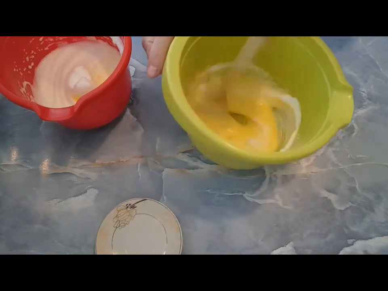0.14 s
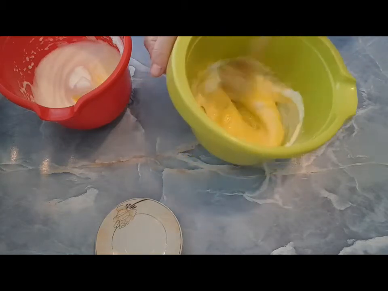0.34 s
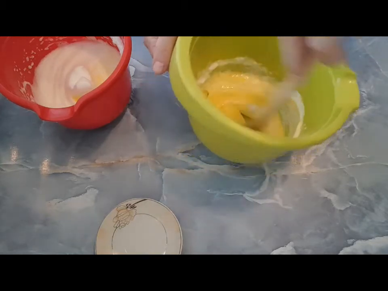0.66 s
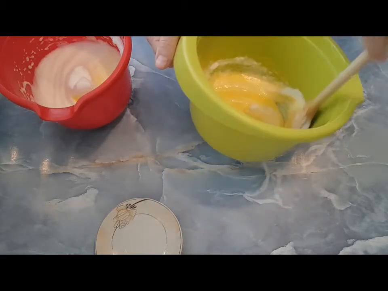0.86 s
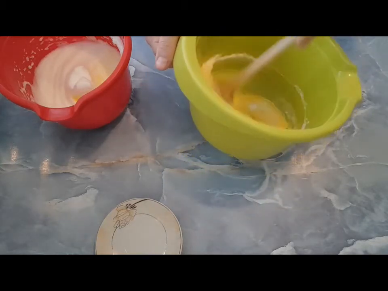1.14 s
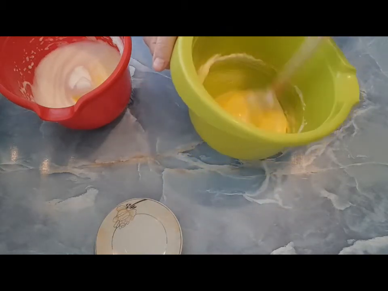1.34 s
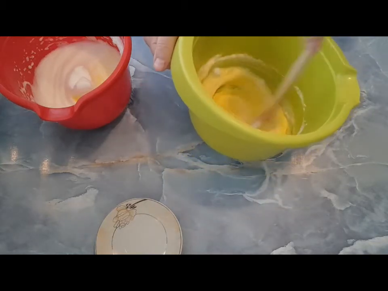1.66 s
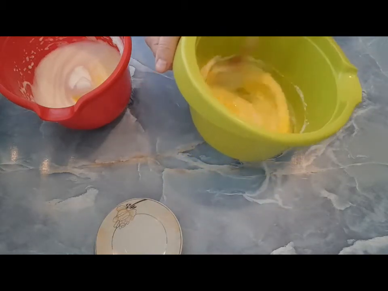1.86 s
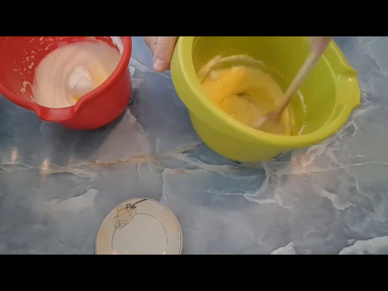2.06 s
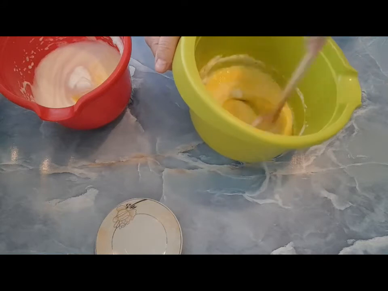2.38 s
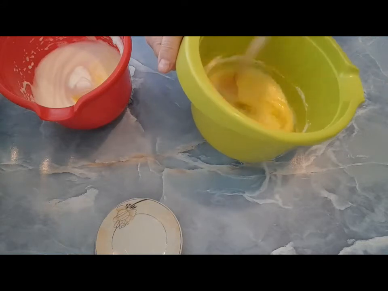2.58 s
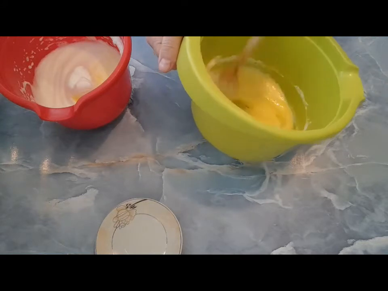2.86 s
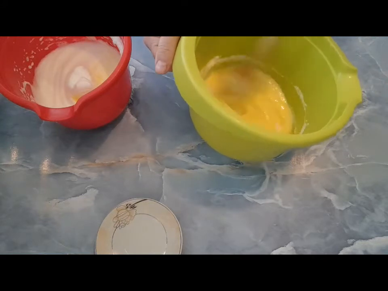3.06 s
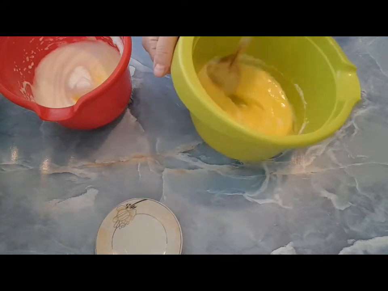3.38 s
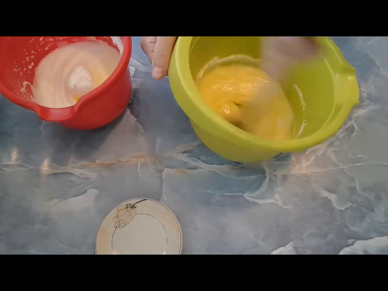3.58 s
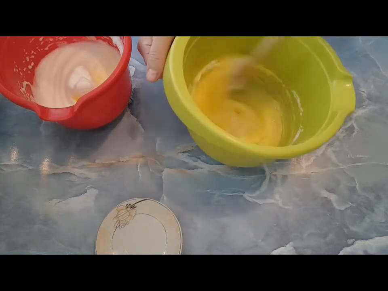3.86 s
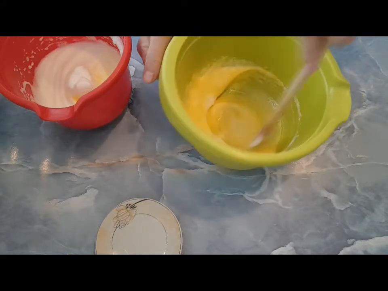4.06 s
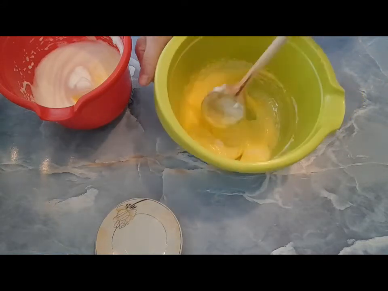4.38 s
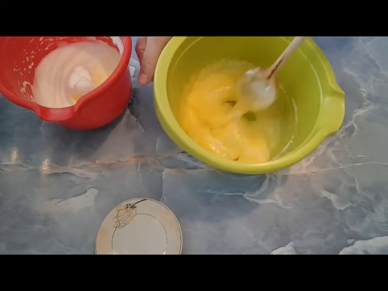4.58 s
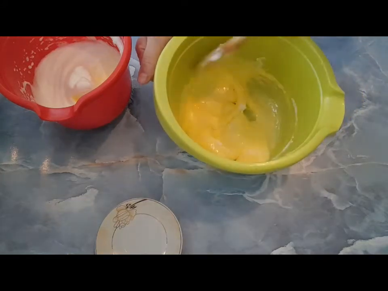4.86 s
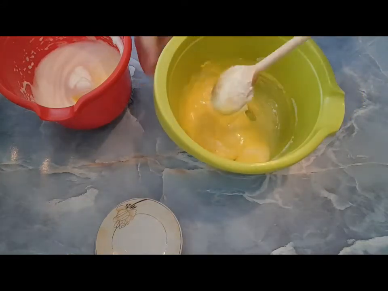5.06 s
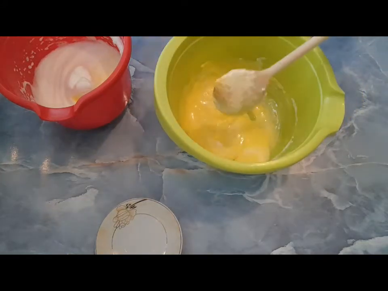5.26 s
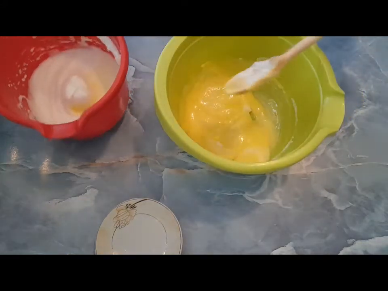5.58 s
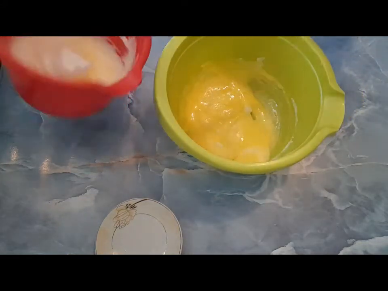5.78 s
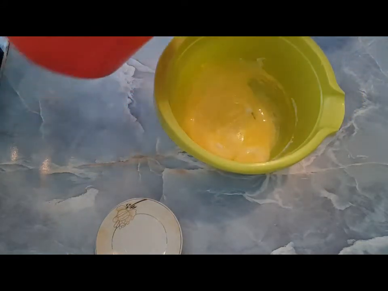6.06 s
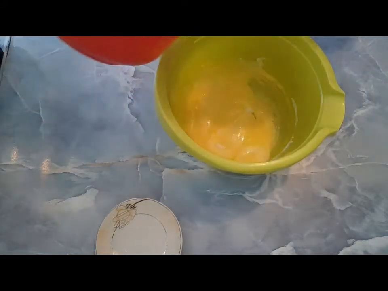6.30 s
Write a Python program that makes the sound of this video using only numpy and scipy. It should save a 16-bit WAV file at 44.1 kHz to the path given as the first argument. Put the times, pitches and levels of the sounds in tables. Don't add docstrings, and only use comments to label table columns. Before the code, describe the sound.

A wooden spoon briskly stirs wet batter in a plastic bowl with hollow knocks and scrapes, then stops for quiet set-down bumps and rim taps.

```python
import sys
import numpy as np
from scipy import signal
from scipy.fft import rfft, irfft, next_fast_len
from scipy.io import wavfile
from scipy.ndimage import uniform_filter1d

SR = 44100
rng = np.random.default_rng(int(sys.argv[2]) if len(sys.argv) > 2 else 0)


def linear_from_db(decibels):
    return 10 ** (np.asarray(decibels, float) / 20)


def dump_mix(stems):
    frames = np.atleast_2d(stems).T
    limited = np.clip(frames, -1, 1)
    pcm = np.round(limited * 32767).astype(np.int16)
    wavfile.write(sys.argv[1], SR, pcm)


N = 283563


def evened(x):
    return x / np.sqrt(np.mean(x ** 2) + 1e-20)


def read(points, hz):
    f, value = np.transpose(points)
    return np.interp(np.log(hz + 1), np.log(f + 1), value)


def colour(x, spectrum):
    log_gain = np.log(linear_from_db(read(spectrum, abs(np.fft.fftfreq(4096, 1 / SR)))))
    response = np.exp(np.conj(signal.hilbert(log_gain)))
    taps = np.fft.ifft(response).real[:2048]
    return signal.oaconvolve(x, taps[None] / np.linalg.norm(taps), axes=1)[:, :N]


def high_pass(x, hz, order):
    return signal.sosfilt(signal.butter(order, hz, "high", fs=SR, output="sos"), x)


def wander(per_s):
    count = int(N / SR * per_s) + 3
    points = np.clip(rng.standard_normal(count), -1.5, 1.5)
    return np.interp(np.arange(N), np.linspace(0, N, count), points)


def ring(force, hz, t60):
    r, turn = linear_from_db(-60 / (t60 * SR)), 2 * np.pi * hz / SR
    return signal.lfilter([0, np.sin(turn)], [1, -2 * r * np.cos(turn), r * r], force)


def body(modes, force, blows_db, wander_db, blow_spread_db, blow_db):
    start = blows()[:, 0]
    at = (start * SR).astype(int)
    hz, db, t60 = np.transpose(modes)
    noise_gain = np.sqrt(np.sum(linear_from_db(db) ** 2 * t60 * SR / (4 * np.log(1000))))
    place = rng.standard_normal((len(start), 2, len(modes)))
    out = np.zeros((2, N))
    for k in range(len(modes)):
        push = force * linear_from_db(wander_db * wander(per_s=6.7)) / noise_gain
        signs = np.array([np.ones(len(start)), np.sign(place[:, 1, k])])
        push[:, at] += signs * linear_from_db(blows_db + blow_db + blow_spread_db * np.tanh(place[:, 0, k]))
        out += linear_from_db(db[k]) * ring(push, hz[k], t60[k])
    return out


def thump(rows, t60, rise_s, overtone, overtone_db, db, sag):
    t, out = np.arange(9000) / SR, np.zeros(N + 9000)
    sag_s, dry_above_hz = 0.0054, 600
    for start, peak_db, hz in rows:
        turn = 2 * np.pi * hz * np.cumsum(1 + sag * np.exp(-t / sag_s)) / SR
        tone = np.sin(turn) + linear_from_db(overtone_db) * np.sin(overtone * turn)
        fade_db = 60 * t / t60 * max(hz / dry_above_hz, 1) ** 2
        out[int(start * SR):][:len(t)] += linear_from_db(peak_db + db - fade_db) * (1 - np.exp(-t / rise_s)) * tone
    return out[:N]


def slips(per_s, spread_db, length_s, steady):
    size = linear_from_db(spread_db * np.minimum(rng.exponential(1, N), 3)) * (rng.random(N) < per_s / SR)
    clumps = signal.lfilter([1], [1, -np.exp(-1 / (length_s * SR))], size)
    return evened(steady + evened(clumps))


STIR_RISE_DB_PER_S, TOUCH_RISE_DB_PER_S, SOFT_RISE_DB_PER_S = 909.5, 4005.5, 2500
SCRAPE_FALL_DB_PER_S, PUSH_FALL_DB_PER_S = 519, 605.5


def strokes(rows, rise_db_per_s, fall_db_per_s):
    t = np.arange(0, N, 32) / SR
    start, length, db, swell_db, share_db = np.transpose(rows)[:, :, None]
    level_db = db + swell_db * np.clip((t - start) / length, 0, 1)
    level_db = level_db - rise_db_per_s * np.maximum(start - t, 0)
    level_db = level_db - fall_db_per_s * np.maximum(t - start - length, 0)
    layers = [np.linalg.norm(linear_from_db(level_db + d), axis=0) for d in (0, share_db)]
    return [np.interp(np.arange(N) / SR, t, gain) for gain in layers]


def contact(stirred, touched, fall_db_per_s, lift):
    hits = np.append(blows()[:, 0], np.array(THUMPS)[:, 0])

    def gains(rows, soft_rise):
        gap_s = abs(np.array(rows)[:, :1] - hits).min(axis=1, keepdims=True)
        return np.array(strokes(rows, np.where(gap_s < .006, TOUCH_RISE_DB_PER_S, soft_rise), fall_db_per_s))

    return gains(stirred, STIR_RISE_DB_PER_S) * lift + gains(touched, SOFT_RISE_DB_PER_S)


# [f/Hz, level/dB per Hz]
FLOOR = [(33, -27.5), (52, -5), (204, 0.5), (426, -18), (750, -15.5), (2540, -25.5), (4910, -21.5),
         (8520, -21.5), (9710, -14.5), (14400, -22.5), (16000, -25.5)]


def floor():
    return linear_from_db(-75) * colour(rng.standard_normal((2, N)), FLOOR)


# [t/s, length/s, bowl level/dB, swell/dB, counter re bowl/dB]
PUSHES = [(0, 0.68, -32.5, -13.5, -2), (0.182, 0.029, -45, 18.5, -6), (0.336, 0.17, -34.5, 4.5, -1.5),
          (0.538, 0.075, -36, 0.5, -8.5), (0.675, 0.92, -57, -11, 1.5), (0.844, 0.2, -51.5, 31, -5.5),
          (1.07, 1.406, -36, 6, -5), (1.261, 0.064, -31, 8.5, -5), (1.414, 0.17, -29, -10.5, 0),
          (1.658, 0.062, -30.5, -7, 0), (1.904, 0.13, -24, -3.5, -10.5), (2.199, 0.062, -20.5, -16, -2),
          (2.4243, 0.57, -38.5, 4.5, -3.5), (2.749, 0.019, -28, 1.5, -16.5), (2.901, 1.346, -34.5, -14, -5),
          (2.972, 0.021, -39, -1.5, -7.5), (3.163, 0.16, -25, -5.5, -5), (3.41, 0.13, -33.5, -2, -2.5),
          (3.582, 0.057, -42.5, 3.5, -6.5), (3.769, 0.15, -28, -6.5, -1.5), (3.947, 0.12, -32.5, 2.5, -1),
          (4.1265, 0.073, -33, -7, 3)]
SHIFTS = [(4.322, 0.097, -38.5, -16, 9.5), (4.554, 0.086, -93, -7.5, 30.5), (4.651, 0.309, -64, 10, 1.5),
          (4.785, 0.075, -56, 14, -15), (4.85, 0.39, -91.5, -19, 40), (5.337, 0.048, -60.5, -5, 15),
          (5.388, 0.025, -61, 0.5, 23.5), (5.41, 0.1124, -42, -21.5, 17.5), (5.594, 0.027, -53, -4, 15.5),
          (5.64, 0.158, -82.5, -20, 27.5), (6.306, 0.089, -41.5, -12.5, 4)]


def pushes(lift):
    return contact(PUSHES, SHIFTS, PUSH_FALL_DB_PER_S, lift)


# [f/Hz, level/dB, t60/s]
COUNTER = [(114.1, -2.5, 0.33), (124.7, -13.5, 0.46), (162.7, 1, 0.21), (220.2, 1, 0.11), (256, -6, 0.13),
           (301.2, 1.5, 0.086), (330, -10, 0.22)]


def counter(drag, gain, blows_db):
    force = drag * gain * linear_from_db(-2.5)
    rung = body(COUNTER, force, blows_db, wander_db=1.5, blow_spread_db=-1.5, blow_db=-7.0)
    return signal.sosfilt(signal.butter(4, 365, fs=SR, output="sos"), rung)


# [f/Hz, level/dB, t60/s]
BOWL = [(375, -10.5, .035), (440, -21, .025), (535, -10.5, 0.056), (554, 1, 0.135), (581.7, 1, 0.092),
        (633.7, -10, 0.16), (718, -13, 0.1), (778, -17.5, 0.065), (889, -14, 0.079), (994, -21.5, 0.067)]


def bowl(drag, gain, blows_db):
    rung = body(BOWL, drag * gain * linear_from_db(-4.0), blows_db, wander_db=2.5, blow_spread_db=3.0, blow_db=-10.5)
    return high_pass(rung, hz=362, order=4)


# [f/Hz, level/dB, t60/s]
CABINET = [(52.7, -11.5, 0.3), (59.3, -16, 0.069)]


def cabinet(drag, gain, blows_db):
    house = linear_from_db(-79 + 3.0 * wander(per_s=5))
    force = drag * (gain * linear_from_db(-21.0) + house)
    return body(CABINET, force, blows_db, wander_db=1.5, blow_spread_db=3.5, blow_db=-11)


# [t/s, peak level/dB, f/Hz]
SLAPS = [(0.125, -26, 554), (0.175, -25, 555), (0.377, -23.5, 560), (0.433, -21.5, 549), (0.42, -24, 553),
         (0, -29.5, 548), (0.266, -30, 560), (0.461, -25, 567), (0.538, -25.5, 552), (0.559, -23.5, 535),
         (1.01, -22.5, 598), (1.026, -23, 580), (1.135, -27, 600), (1.266, -26.5, 532), (1.287, -22.5, 601),
         (1.333, -31.5, 566), (1.413, -22.5, 544), (1.505, -26.5, 548), (1.536, -26, 576),
         (1.695, -21.5, 590), (1.872, -27, 503), (1.932, -22, 513), (2.01, -18.5, 541), (2.203, -20.5, 554),
         (2.311, -28, 590), (2.552, -35, 531), (2.592, -23.5, 567), (2.744, -21, 551), (2.982, -22.5, 736),
         (3.404, -28, 558), (3.455, -23.5, 556), (3.585, -25, 539), (3.765, -23, 571), (3.813, -19, 556),
         (3.875, -20.5, 573), (3.942, -25, 570), (3.984, -25.5, 555), (4.02, -18.5, 545),
         (4.059, -20.5, 566), (4.127, -21, 575), (4.165, -25.5, 551), (1.205, -27.0, 565),
         (2.527, -25.5, 440), (1.7, -30, 1000), (3.5, -25.5, 460), (2.903, -16.5, 700), (2.6, -23.5, 980),
         (3.164, -25, 1000), (0.198, -26.5, 460), (1.379, -23.5, 546), (3.42, -23.5, 420)]


def slaps():
    return thump(SLAPS, t60=0.11, rise_s=0.0015, overtone=1.13, overtone_db=-10.5, db=-0.5, sag=.06)


# [t/s, length/s, hiss level/dB, swell/dB, wall ring re hiss/dB]
SCRAPES = [(0.002, 0.53, -38.5, -3.5, -5), (0.112, 0.073, -40, 3, 8), (0.309, 0.009, -37, 2.5, 6),
           (0.503, 1.198, -54, 14.5, 8.5), (0.538, 0.1, -42.5, 0.5, 10.5), (0.92, 0.15, -38.5, 7, -8.5),
           (1.129, 0.021, -41.5, 5, -14.5), (1.38, 0.044, -41, 6.5, 16), (1.483, 0.089, -45, 9.5, -11.5),
           (1.734, 1.53, -41, -4, 7), (1.872, 0.11, -37, -1.5, -25), (1.945, 0.053, -31, -12.5, 1),
           (2.073, 0.35, -43, 5, 12.5), (2.73, 0.024, -40, 2, 13.5), (2.849, 0.066, -40.5, -4, 19.5),
           (2.983, 0.083, -49, -1.5, 3.5), (3.101, 0.32, -45.5, -12.5, 13), (3.267, 0.032, -38, -1.5, 13),
           (3.355, 0.78, -49, 11.5, -0.5), (3.535, 0.074, -37, -5.5, -15), (3.582, 0.14, -29.5, -29.5, -2),
           (3.807, 0.076, -37.5, 0.5, 1), (4.204, 0.088, -62, -25, 18.5)]
BRUSHES = [(4.412, 0.024, -63.5, -7, -11), (4.652, 0.14, -75, 13.5, 10), (4.653, 0.025, -53, -18, -9),
           (4.783, 0.067, -41.5, -3, -20), (4.88, 0.083, -63.5, 4.5, -1), (4.988, 0.26, -74, -26, -17),
           (5.218, 0.12, -69.5, -20, -8), (5.337, .2, -72, -5, -10), (5.407, 0.036, -63.5, -7, 16),
           (5.475, 0.01, -62, 5, 5), (5.6, 0.062, -71.5, -14, -6), (5.75, 0.15, -69.5, -33, 4),
           (6.012, 0.053, -72, -11, -6.5), (6.28, 0.028, -74, 4.5, -16), (6.301, 0.14, -67.5, 4.5, 11),
           (6.365, 0.019, -68, -3.5, 29)]


def scrapes(lift):
    return contact(SCRAPES, BRUSHES, SCRAPE_FALL_DB_PER_S, lift)


# [f/Hz, level/dB, t60/s]
WALL = [(1380, -4, .025), (1500, 0, .035), (1650, -4, .02), (1850, -5, .018), (2070, -4, .02),
        (2300, -6, .015), (2640, -3, .028), (2930, -5, .02), (3250, -6, .015), (3750, -8, .015)]


def wall(squelch, gain, blows_db):
    force = squelch * rng.standard_normal((2, N)) * gain * linear_from_db(-11.5)
    rung = body(WALL, force, blows_db, wander_db=6.0, blow_spread_db=6.5, blow_db=-30)
    return high_pass(rung, hz=1400, order=2)


def patchy(x, patchy_db, frames, bins):
    hz, t, z = signal.stft(x, SR, nperseg=512)
    patches = rng.standard_normal(z.shape[1:])
    patches = evened(uniform_filter1d(uniform_filter1d(patches, bins, 0), frames, 1))
    return signal.istft(z * linear_from_db(patchy_db * patches), SR, nperseg=512)[1][:, :N]


# [f/Hz, level/dB per Hz]
HISS = [(470, -29.5), (800, -5), (1150, -21), (1460, -0.5), (2660, -3.5), (7260, -9.5), (10100, -8.5),
        (15000, -15.5), (16100, -38)]
# [f/Hz, level/dB per Hz]
FINGERS = [(530, -39), (900, -36), (1010, -3), (1330, -63), (1520, -26), (2120, -9), (2570, -11.5),
           (2930, -1), (3540, -10), (4390, -4.5), (8250, -12), (10500, -10), (15500, -19.5)]
# [start t/s, end t/s]
FINGERS_S = [(4.4, 4.6), (5.0, 6.27)]
# [f/Hz, level/dB per Hz]
DRY_RIM = [(500, -11.5), (900, 6), (1150, -19), (1700, -2), (3200, -8), (5000, -2), (7000, -6.5),
           (14100, -15), (16300, -41.5)]
# [start t/s, end t/s]
DRY_RIM_S = (4.77, 5.0)


def hiss(envelope):
    t = np.arange(N) / SR
    hands = sum((t > start) & (t < end) for start, end in FINGERS_S)
    rim = (t > DRY_RIM_S[0]) & (t < DRY_RIM_S[1])
    noise = evened(patchy(rng.standard_normal((2, N)), patchy_db=3.5, frames=7, bins=5)) * envelope
    wet = colour(noise * (1 - hands - rim), HISS)
    return wet + linear_from_db(3.0) * colour(noise * hands, FINGERS) + linear_from_db(-1.5) * colour(noise * rim, DRY_RIM)


# [t/s, length/s, scrape loss/dB, push loss/dB]
LIFTS = [(0.026, 0.069, 1.5, 11), (0.197, 0.1, 4, 4.5), (0.509, 0.025, 15, -0.5), (1.158, .028, 1, 9),
         (1.291, 0.077, 4, 4.5), (1.754, 0.065, -2.5, 13), (1.828, 0.05, 0, 8.5), (2.36, 0.07, 18, 25.5),
         (2.538, .013, 1, 10), (2.655, 0.05, 5.5, 2), (2.935, 0.025, 3, 4.5), (3.193, 0.03, 8, 11),
         (3.32, 0.027, 10.5, 2), (3.442, 0.062, 6, -1), (3.7, 0.045, 0.5, 5.5)]


def lifts():
    t, loss_db = np.arange(N) / SR, np.zeros((2, N))
    for start, length, *db in LIFTS:
        loss_db += np.outer(db, (t > start) & (t < start + length))
    edge_s = 0.004
    return linear_from_db(-uniform_filter1d(loss_db, int(edge_s * SR)))


# [t/s, peak level/dB, f/Hz]
EDGE_TICKS = [(0.1112, -32, 2750), (0.4358, -14.5, 2660), (0.6225, -32.5, 1460), (0.6331, -16, 1430),
              (1.049, -18.5, 4400), (1.1293, -25, 2430), (1.1416, -20, 3280), (1.4082, -15.5, 1770),
              (1.6714, -29.5, 3070), (1.706, -21.5, 1400), (1.9472, -21, 1480), (2.0513, -22, 3040),
              (2.603, -25, 1450), (2.872, -21.5, 1480), (2.9566, -33, 1490), (3.4053, -38, 1490),
              (3.5332, -30.5, 2290), (3.8511, -13.5, 1930), (3.8661, -21.5, 1850), (3.982, -19.5, 2100),
              (4.017, -19, 2920), (4.075, -19.5, 2980), (4.4153, -50, 4420), (4.7592, -40, 2980),
              (4.8087, -29.5, 4800), (2.0, -22, 1800), (1.0512, -9.5, 5000), (6.366, -39, 3200),
              (1.421, -15.5, 2100), (1.1, -18.5, 2100), (3.915, -21.5, 6000)]
# [t/s, tick peak level/dB, bowl re tick/dB, counter re tick/dB, tick f/Hz]
WALL_KNOCKS = [(0.15, -15, -36, -32.5, 2750), (0.1675, -22, -3, -33, 1660), (0.3773, -13.5, -20, -11, 2020),
               (0.4756, -16.5, -6, -15.5, 1580), (1.0217, -16.5, -5, -17.5, 4130),
               (1.049, -17.5, -2, -10.5, 4300), (1.437, -8, -16, -12.5, 2610),
               (1.483, -13.5, -40.5, -11.5, 2570), (1.5391, -20.5, 2.5, -16.5, 2680),
               (1.7938, -16, -9, -22.5, 1795), (1.8715, -12.5, -3, -19, 2700), (2.073, -13, -10, -26, 2110),
               (2.1994, -9.5, -5.5, -11, 2650), (2.2865, -10.5, -12.5, -22, 1930),
               (2.425, -19.5, -39, -20.5, 1680), (2.5553, -24, 2.5, -8, 1980),
               (2.727, -26.5, -16, -12.5, 1620), (3.3553, -15.5, -42, -13, 2130),
               (3.581, -15, -12.5, -20, 2820), (3.8058, -17.5, -10.5, -13.5, 2700),
               (3.828, -14.5, -28.5, -33, 1840), (3.898, -11.5, -11.5, -15.5, 2980),
               (4.0692, -14, -2.5, -26.5, 3040)]
# [t/s, tick peak level/dB, bowl re tick/dB, counter re tick/dB]
RIM_KNOCKS = [(0.2985, -19.5, -20.5, -31), (0.3237, -21, -28, -15.5), (0.3387, -13.5, -4.5, -7.5),
              (0.5387, -20.5, -16, -13.5), (0.8473, -19.5, -33, -25.5), (0.92, -25.5, -4, -9.5),
              (0.941, -17, -22.5, -9.5), (1.261, -18, -0.5, -16), (1.2885, -19.5, -10, -21),
              (1.381, -20.5, -14, -9.5), (2.111, -12, -12, -19), (2.477, -19, -15, -35.5),
              (2.6833, -25, 0, -11.5), (2.7444, -18, -6.5, -12.5), (2.8523, -22.5, -4, -6.5),
              (2.9824, -11, -36, -37), (3.045, -18, -12.5, -39), (3.1628, -11.5, 2, -13),
              (3.267, -11.5, -15, -14), (3.6542, -20.5, -22, -31), (4.1263, -13.5, -6.5, -38.5),
              (4.1622, -18, -20, -20)]
RIM_HZ = 1480
# [t/s, tick peak level/dB, bowl re tick/dB, counter re tick/dB, tick f/Hz]
BUMPS = [
    (4.319, -41, 14, 10.5, 1048),
    (4.6524, -41, -5.5, -12, 1570),
    (4.7222, -40, -16, -33, 3440),
    (4.782, -36, -32, -33, 4860),
    (4.8439, -16.5, -13, -26.5, 5100),
    (5.3361, -50, -6, -2.5, 3300),
    (5.4131, -44.5, 9.5, 19.5, 1080),
    (5.596, -68, -7, 7.5, 1013),
    (6.308, -39.5, 10, -15, 2292),
]


def blows():
    edge = [(s, db, -20.5, -29.5, hz) for s, db, hz in EDGE_TICKS]
    return np.array([(*row, RIM_HZ) for row in RIM_KNOCKS] + WALL_KNOCKS + BUMPS + edge)


def ticks():
    t = np.arange(2000) / SR
    cracks, tones = np.zeros((2, N + 2000)), np.zeros((2, N + 2000))
    crack = (1 - np.exp(-t / 0.0004)) * np.exp(-t / .0017)
    snap = np.exp(-t / 0.00019)
    spray = linear_from_db(-17) * np.exp(-t / .014)
    tone_db, tone_t60 = -11, 0.034
    for start, db, _, _, hz in blows():
        at = slice(int(start * SR), int(start * SR) + len(t))
        noise = rng.standard_normal((2, len(t)))
        top_hz = min(8000 * hz / RIM_HZ, .45 * SR)
        dull = signal.lfilter(*signal.butter(1, top_hz, fs=SR), noise)
        cracks[:, at] += linear_from_db(db - 5.0) * (crack + snap + spray) * dull
        rough_hz = hz * rng.uniform(1.1, 1.8, (2, 1))
        pair = np.sin(2 * np.pi * hz * t) + 0.26 * np.sin(2 * np.pi * rough_hz * t)
        tones[:, at] += linear_from_db(db + tone_db - 60 * t / tone_t60 * max(hz / 2200, 1)) * pair
    return colour(cracks, HISS) + tones[:, :N]


# [t/s, length/s, hum level/dB, swell/dB, upper hum re hum/dB]
HUMS = [(0.297, 0.051, -42.5, 5, -17), (0.387, 0.036, -46.5, 3, 2), (.575, 0.078, -40, 5.5, -9.5),
        (.66, 0.15, -68, -4, -11), (.85, .03, -49.5, -3.5, -5), (0.917, 0.064, -33, 3.5, -11.5),
        (1.52, 0.11, -50, 4.5, 5.5), (1.942, 0.077, -42, 0, 0), (2.097, 0.044, -45, -2, 9.5),
        (2.288, .06, -41.5, 4, 1), (3.01, 0.058, -44.5, -1, -14), (3.41, 0.041, -55.5, 3, -5.5),
        (3.59, 0.083, -40, -1.5, -2), (4.133, 0.055, -39, -11.5, -2)]
HUM_HZ = (1490, 2630)


def hums():
    t60_s, drift = 0.024, .015
    out, decay = np.zeros((2, N)), linear_from_db(-60 / (t60_s * SR))
    for hz, level in zip(HUM_HZ, strokes(HUMS, STIR_RISE_DB_PER_S, SCRAPE_FALL_DB_PER_S)):
        turn = np.exp(2j * np.pi * np.cumsum(hz * (1 + drift * wander(per_s=9))) / SR)
        a, b = rng.standard_normal((2, 2, N))
        narrow = signal.lfilter([1], [1, -decay], a + 1j * b)
        out += level * evened((turn * narrow).real)
    return out


# [t/s, peak level/dB, f/Hz]
ROCKS = [(0.338, -27, 287), (0.439, -20, 167), (0.64, -36.5, 261), (0.85, -29.5, 154), (0.956, -23.5, 156),
         (1.294, -28, 233), (1.413, -30, 158), (1.666, -25.5, 294), (1.801, -30, 226), (2.121, -28.5, 130),
         (2.197, -19, 217), (2.35, -34.5, 297), (2.427, -23.5, 115), (2.523, -25.5, 155), (2.74, -31, 158),
         (2.886, -22, 232), (2.983, -35.5, 255), (3.262, -26, 270), (3.353, -29, 266), (3.87, -26, 298),
         (3.977, -26.5, 152), (4.16, -35.5, 157), (1.09, -25.5, 247), (3.785, -19, 250.4),
         (4.335, -34, 114), (4.345, -24, 159.5), (4.74, -50, 170), (0.88, -34, 165), (5.43, -33.5, 246),
         (5.595, -46, 201)]


def rocks():
    return thump(ROCKS, t60=0.16, rise_s=0.0038, overtone=1.38, overtone_db=-7, db=-3.5, sag=0.062)


# [t/s, peak level/dB, f/Hz]
THUMPS = [(0.344, -30, 600), (0.642, -21.5, 505), (1.188, -16, 553), (1.706, -11.5, 587),
          (2.136, -6.5, 636), (2.609, -18, 598), (2.887, -6, 596), (3.1635, -3.5, 595), (3.225, -31.5, 546),
          (3.306, -16, 545), (3.767, -14, 259), (4.039, -16, 537), (5.414, -22.5, 330), (5.42, -37, 600),
          (5.426, -50, 1112), (6.311, -25, 261.7)]


def thumps():
    return thump(THUMPS, t60=0.06, rise_s=0.003, overtone=1.27, overtone_db=-9.5, db=-4.0, sag=.15)


# [f/Hz, t60/s]
ROOM = [(200, 0.17), (1000, 0.039), (4000, 0.26), (12000, 0.23)]


def room(x):
    taps = np.zeros((2, SR // 2))
    at = np.arange(150, SR // 2 - 20, 20) + rng.integers(0, 20, (2, (SR // 2 - 151) // 20))
    np.put_along_axis(taps, at, rng.choice([-1., 1.], at.shape), 1)
    hz, t, z = signal.stft(taps, SR, nperseg=256)
    tail = signal.istft(z * linear_from_db(-60 * t / read(ROOM, hz)[:, None]), SR, nperseg=256)[1]
    return signal.fftconvolve(x[:1], tail / np.linalg.norm(tail[0]), axes=1)[:, :N]


# [f/Hz, share 0-1]
SAME = [(60, 1), (150, 0.985), (380, 0.85), (950, 0.66), (2380, 0.26), (5980, 0.061), (15000, 0.027)]
# [f/Hz, left minus right level/dB]
LEAN = [(60, -3.5), (290, 0.5), (640, -1.5), (1400, -2), (3100, -4.5), (6000, -4.5), (9000, 4),
        (13000, 0.5)]


def ports(x):
    size = next_fast_len(N)
    hz, (a, b) = np.fft.rfftfreq(size, 1 / SR), rfft(x, size)
    same, lean = np.clip(read(SAME, hz), -1, 1), linear_from_db(read(LEAN, hz) / 2)
    right = same * a + np.sqrt(1 - same ** 2) * b
    return irfft(np.array([a * lean, right / lean]), size)[:, :N]


def scene():
    scrape_lift, push_lift = lifts()
    air_gain, top_gain = pushes(push_lift)
    wet_gain, side_gain = scrapes(scrape_lift)
    _, tick_db, to_bowl_db, to_counter_db, _ = blows().T
    drag = slips(per_s=140, spread_db=4, length_s=0.0045, steady=1.5) * rng.standard_normal((2, N))
    squelch = slips(per_s=420, spread_db=4.5, length_s=0.001, steady=1.5)
    mix = counter(drag, top_gain, tick_db + to_counter_db)
    mix += bowl(drag, air_gain, tick_db + to_bowl_db)
    mix += wall(squelch, side_gain, tick_db)
    mix += hiss(squelch * wet_gain * linear_from_db(5.5))
    mix += slaps() + ticks() + hums() + rocks() + thumps()
    mix = high_pass(mix, hz=115.6, order=8)
    mix += cabinet(drag, top_gain, tick_db + to_counter_db)
    return ports(mix + linear_from_db(-8.0) * room(mix) + floor())


def low_pass(x):
    return signal.sosfilt(signal.butter(12, 16490, fs=SR, output="sos"), x)


def record(dry):
    b, a = signal.iirnotch(8550, 6.0, SR)
    notched = 0.14 * dry + 0.86 * signal.lfilter(b, a, dry)
    limited = signal.oaconvolve(notched, signal.firwin(255, 16300, fs=SR)[None], "same")
    finished = high_pass(limited, hz=47, order=6)
    return low_pass(finished)


dry = scene()
out = record(dry)
dump_mix(out)
```